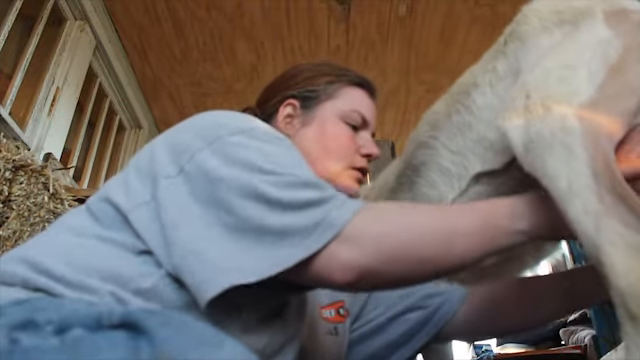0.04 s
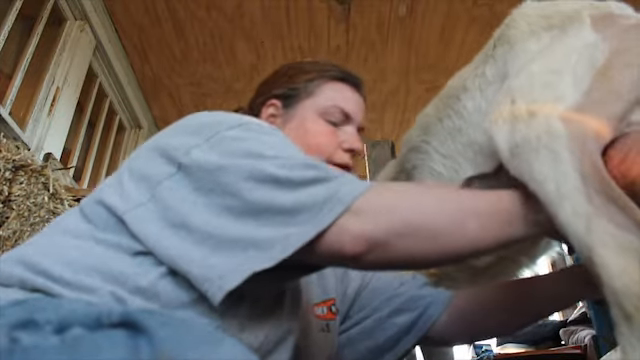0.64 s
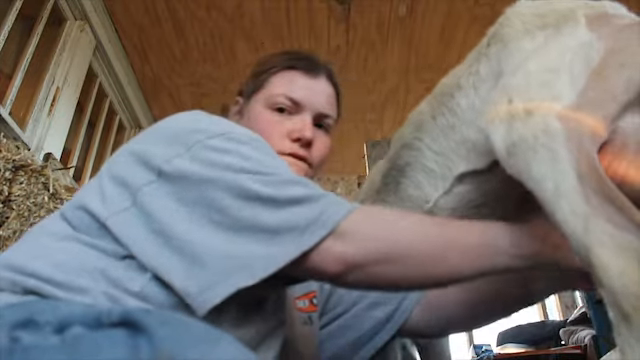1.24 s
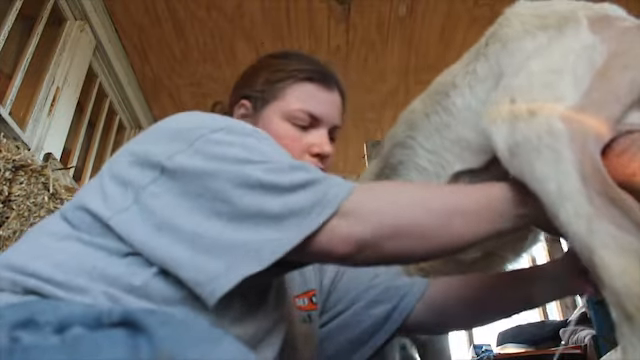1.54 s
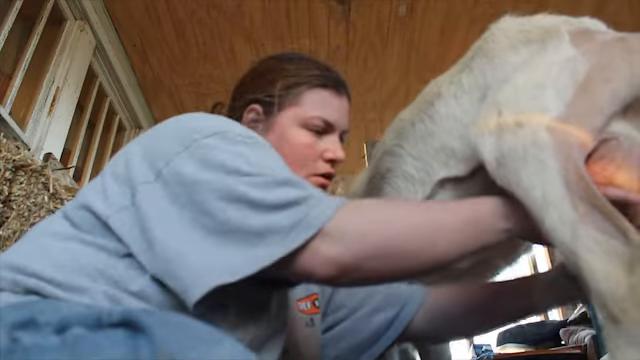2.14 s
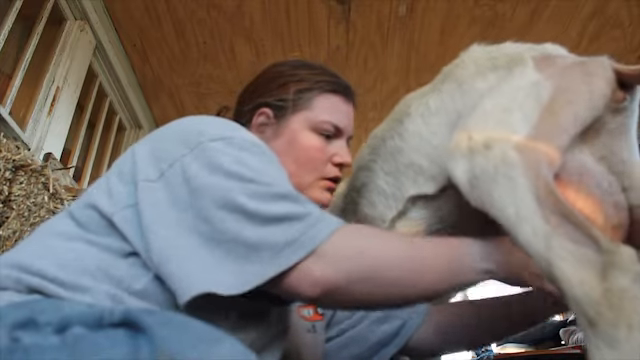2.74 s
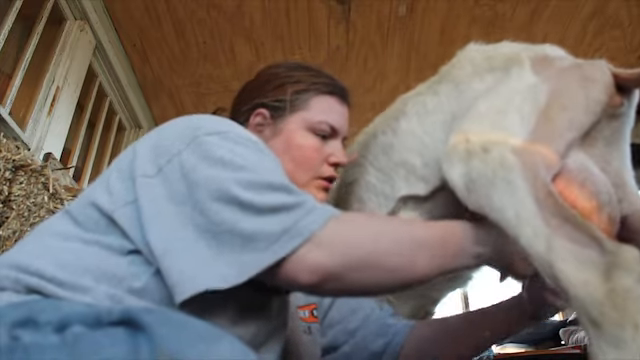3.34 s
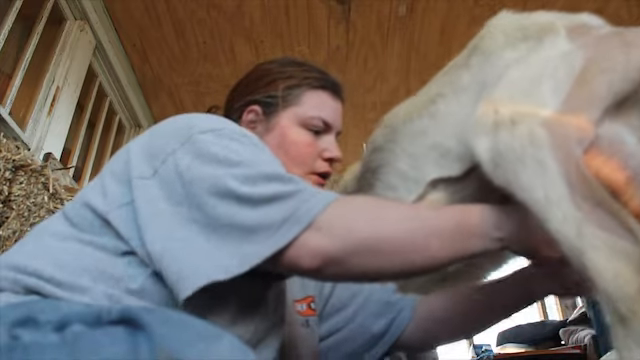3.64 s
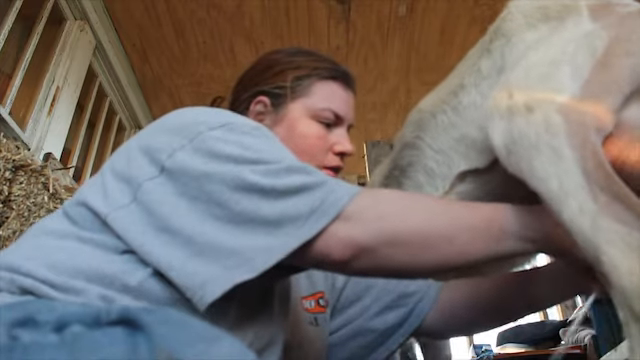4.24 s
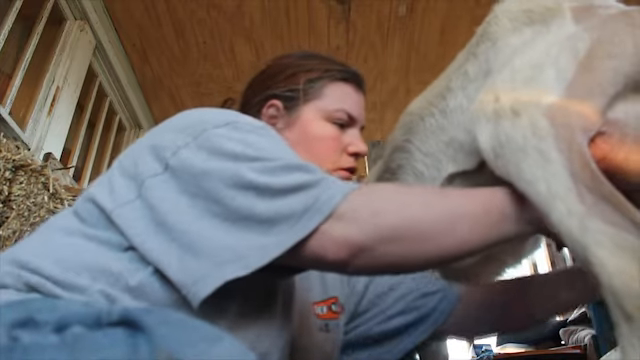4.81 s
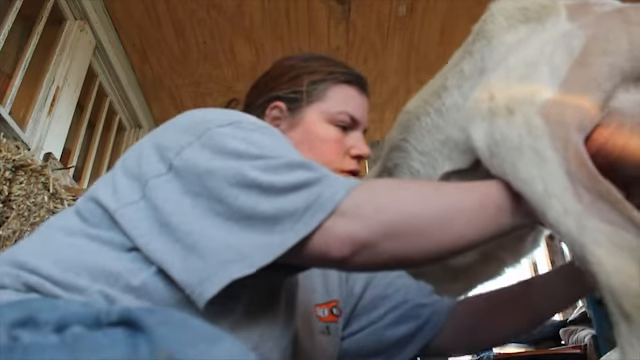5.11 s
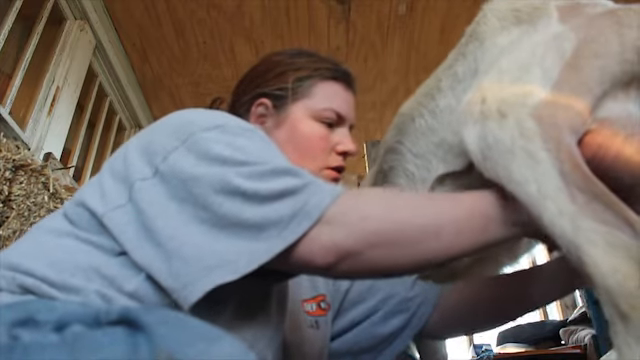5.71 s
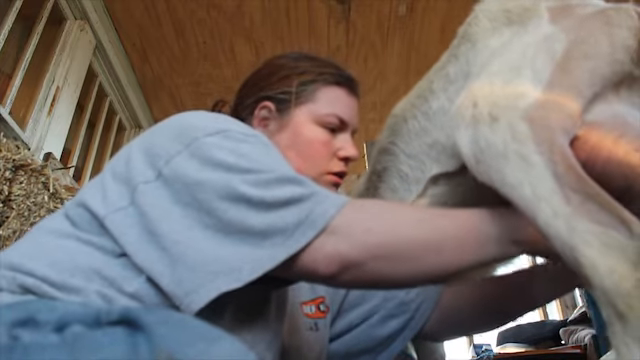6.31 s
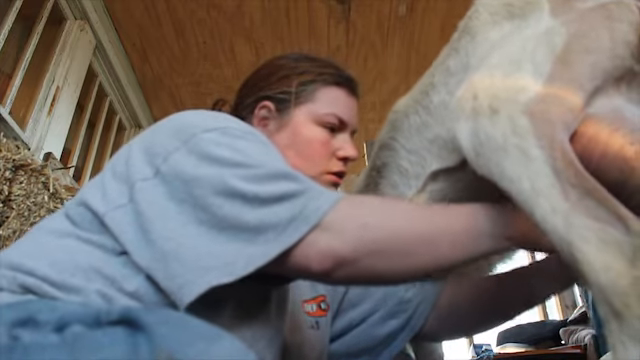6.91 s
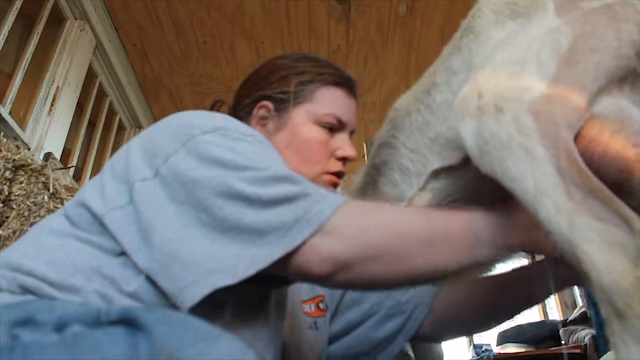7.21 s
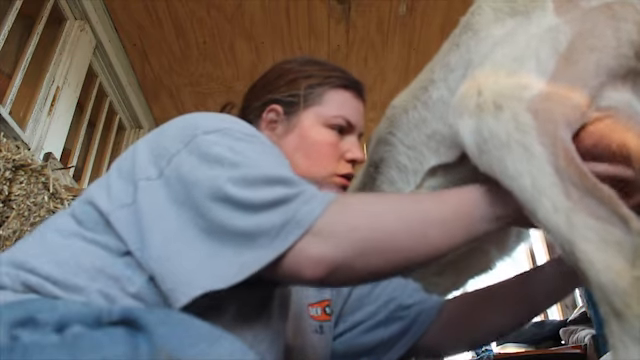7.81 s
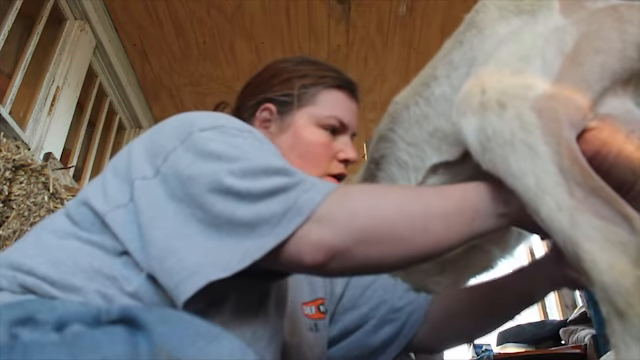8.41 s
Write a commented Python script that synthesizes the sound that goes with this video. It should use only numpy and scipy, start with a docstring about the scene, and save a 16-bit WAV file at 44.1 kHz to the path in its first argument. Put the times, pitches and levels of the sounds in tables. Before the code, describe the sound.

A goat is hand-milked in a small barn, heard up close over a soft rumble and hiss, with faint birds outside. From about 1 to 2.8 seconds, five or six short jets of milk hiss and bubble into a pail, with sharp drops, fizzing foam and a hollow note. A hoof starts dragging near 3 seconds, scrapes harder, and stamps at 3.5 seconds, the loudest sound. The wooden stand groans in low, sliding creaks until about 4.3 seconds, overlapping a longer squirt at 4 seconds. Straw rustles and snaps around 4.5 seconds with a weaker squirt, then the milking pauses and small birds chirp softly. A long squirt arrives at 5.9 seconds with a wooden knock, a strong one at 6.6, and shorter ones until 7.4. Only light knocks and faint straw rustling remain until the end, near 8.7 seconds.

```python
"""Hand-milking a goat

In a small barn, each jet of milk breaks into drops that strike the pail, trap ringing bubbles,
burst the foam and excite the pail's hollow note. The goat drags a hoof and stamps once; its wooden
stand knocks by free vibration and groans by stick-slip friction. Straw rustles, small birds sing
outside, and the walls add a short reverberation over a soft rumble, hiss and hum."""
import sys
import numpy as np
from scipy import signal
from scipy.fft import rfft, irfft
from scipy.io import wavfile
from scipy.ndimage import uniform_filter1d

SR = 44100
rng = np.random.default_rng(int(sys.argv[2]) if len(sys.argv) > 2 else 0)


def store_pcm(level_fs):
    """Save levels as 16-bit WAV."""
    pcm = np.round(np.clip(level_fs, -1, 1) * 32767).astype(np.int16)
    wavfile.write(sys.argv[1], SR, np.atleast_2d(pcm).T)


N = 377055
TIME = np.arange(N) / SR

# Levels in the tables are relative: each source may apply a further gain.
# Spectra of the background, rustling straw and a snapping stalk: (frequency [Hz], level [dB])
AIR_SPECTRUM = [(20, -26), (42, -10.5), (70, -3.5), (120, -11.5), (165, -10.5), (310, -10), (450, -12.5),
                (620, -17), (1500, -19), (2900, -19.5), (4200, -23), (7000, -26.5), (10300, -29.5),
                (12000, -37.5)]
STRAW_SPECTRUM = [(400, 1), (1500, -8), (3000, 8), (6000, 0.5), (12000, -9.5)]
SNAP_SPECTRUM = [(500, -17), (3000, -4), (6000, -2.5), (10500, 0), (12000, -6.5)]
# Tones of the hum: (frequency [Hz], level [dB])
HUM_TONES = [(59.5, -67.5), (103, -63), (119.5, -64)]
# Stirs of the straw: (centre time [s], half length [s], lift [dB])
STRAW_STIRS = [(0.61, 0.048, 13), (3.965, 0.32, 17.5), (4.95, 0.14, 11.5), (5.26, .04, 10),
               (5.4, 0.033, 13.5), (6.487, .11, 10), (7.843, .025, 11.5), (7.95, 0.015, 13),
               (8.24, 0.08, 13)]
# Snapping stalks, and a sharp tick as the squirt at 4.48 s bursts into fizz: (time [s], level [dB])
STALK_SNAPS = [(4.488, -33), (4.513, -32), (4.545, -30), (4.942, -44), (4.972, -44), (5.135, -47),
               (5.39, -49), (5.422, -46), (5.715, -48), (6.478, -54), (7.078, -31), (7.159, -44),
               (7.933, -40), (8.455, -51)]

# Near bird: (time [s], length [s], first pitch [Hz], last pitch [Hz], level [dB], warble depth [ratio])
CHIRPS = [(0.252, 0.051, 3100, 2880, -54, 0.027), (0.545, 0.066, 2990, 3110, -57, .02),
          (0.716, 0.037, 3230, 3410, -50, .02), (0.852, 0.047, 3450, 3210, -52, 0.065),
          (0.892, 0.043, 3750, 3380, -49, 0.075), (1.718, 0.036, 2910, 3420, -49, .02),
          (1.751, .018, 3150, 3080, -50, .02), (4.703, 0.048, 3590, 3520, -40.5, 0.011),
          (4.819, 0.025, 3950, 3450, -45, .07), (4.873, 0.036, 2620, 3030, -49, 0.085),
          (5.002, 0.028, 3900, 3290, -44, .04), (5.037, 0.054, 3700, 3900, -53, 0.07),
          (5.11, 0.054, 4094, 4290, -50.5, 0.024), (5.225, 0.028, 3710, 3250, -54, 0.076),
          (5.266, 0.064, 3460, 4050, -45, 0.018), (5.423, 0.047, 4690, 4950, -55, .03),
          (5.57, 0.048, 4410, 3800, -50, 0.071), (5.702, 0.032, 3610, 2750, -43.5, .04),
          (5.731, 0.05, 2940, 2760, -48.5, 0.023), (5.812, 0.029, 3600, 2740, -53, .1)]
# Second bird: (time [s], length [s], first pitch [Hz], last pitch [Hz], level [dB])
WHISTLES = [(1.945, 0.18, 3253, 3205, -54), (2.35, 0.17, 3160, 3240, -64), (2.78, .07, 3150, 3160, -67),
            (2.89, 0.057, 3170, 3200, -59)]
# Far birds: (centre time [s], half length [s], pitch [Hz], level [dB])
TWITTER_BOUTS = [(0.215, .25, 2984, -61), (0.601, 0.094, 3050, -68), (0.9, 0.052, 3240, -59),
                 (3.303, 0.084, 4180, -58.5), (5.148, .3, 3740, -64.5), (5.836, 0.026, 3160, -58),
                 (6.943, .09, 3000, -54), (7.881, 0.069, 3200, -71), (8.249, 0.28, 2620, -64)]

# Blows of hooves and pail on the stand: (time [s], ring level [dB], crack level [dB])
BLOWS = [(.005, -44, -38.5), (0.322, -48, -48), (.51, -50, -60), (.687, -45, -62), (1.289, -37.5, -41),
         (1.478, -38, -45), (1.541, -31, -46), (1.64, -29.5, -42), (1.838, -22, -25), (2.088, -45, -46),
         (2.456, -45, -52), (2.678, -30.5, -47), (2.753, -34.5, -49), (3.209, -40, -36.5),
         (3.302, -55, -59), (3.541, -4.5, -11), (3.56, -20, -26), (3.571, -14, -42), (3.799, -26, -38),
         (4.697, -36, -54), (4.874, -34.5, -34), (5.179, -46, -47), (5.25, -41, -48), (5.657, -43.5, -52),
         (5.956, -25.5, -44), (6.123, -15.5, -36), (6.398, -40.5, -62), (6.828, -35, -45),
         (7.036, -34, -35), (7.337, -32.5, -48), (7.58, -49, -60), (7.801, -46.5, -63), (7.989, -47.5, -60),
         (8.221, -43.5, -62)]
# Normal modes of the stand: (frequency [Hz], level [dB], 60 dB decay time [s])
STAND_MODES = [(40.2, -33, 1), (87.2, -26, 0.53), (141.4, -23.5, 0.24), (162.2, -30.5, 0.23),
               (268.4, -11, 0.17), (335.8, 7.5, 0.044), (325.6, -23, 0.34), (398.8, -9, 0.14),
               (461, -15, 0.13), (661, -17.5, 0.092), (837, -24, 0.048)]
# Contact spectra of a hoof and of a large drop: (frequency [Hz], level [dB])
HOOF_SPECTRUM = [(30, -62), (150, 11), (400, -5), (560, 3.5), (800, -2.5), (1400, 0), (2500, -5.5),
                 (4000, -11), (7000, -24.5), (12000, -44)]
SPATTER_SPECTRUM = [(200, -5), (800, -0.5), (1600, -0.5), (2600, 1), (3600, -2.5), (4600, -14), (7000, -11),
                    (12000, -37)]

# Large drops on the pail: (time [s], level [dB], resonance of the struck spot [Hz])
SPATTERS = [(1.08, -19.5, 1740), (1.302, -17.5, 3300), (1.316, -20.5, 3100), (1.358, -29.5, 1090),
            (1.472, -33, 900), (1.507, -16, 1150), (1.521, -19, 1150), (1.606, -20, 5200),
            (1.798, -28, 2780), (1.823, -10, 2580), (2.567, -24, 2510), (2.657, -9.5, 3520),
            (2.74, -26, 2980), (4.083, -12, 3350), (4.146, -14, 1500), (4.162, -15, 2650),
            (5.952, -20, 2900), (5.999, -30, 2600), (6.065, -15.5, 3080), (6.071, -15, 3020),
            (6.199, -23, 2300), (6.25, -16, 2180), (6.651, -10.5, 3040), (6.673, -11, 3400),
            (6.691, -13, 3240), (6.810, -34, 3300), (6.826, -32, 3320), (6.865, -32, 2880),
            (7.038, -34, 2070), (7.064, -27, 3400), (7.099, -18, 2600), (7.11, -25, 2400),
            (7.123, -31, 2700), (7.162, -31, 895), (7.327, -33, 3000), (7.370, -11, 3300),
            (7.380, -15, 2550), (7.389, -26, 2600)]
# Resonances of the pail: (frequency [Hz], width [Hz], lift [dB])
PAIL_MODES = [(784, 210, 3), (981, 37, 5), (1130, 68, 4), (1270, 56, 3.5), (1425, 29, 6.5), (1490, 60, 3.5),
              (1550, 26, 2), (1606, 70, 4.5), (1730, 47, 3), (1930, 60, 1.5), (2260, 45, -0.5),
              (2314, 50, 2), (2490, 76, 2.5), (2930, 71, -4), (3170, 77, 2.5), (3445, 110, 3.5),
              (4190, 190, 3)]
# Squeezes of a teat: (time [s], attack [s], hold [s], release [s], swell over the hold [dB],
# patter level [dB], fizz level [dB], hollow note level [dB])
SQUIRTS = [ (1.082, 0.069, 0.099, 0.23, -4, -36, -43.5, -43.5),
           (1.385, 0.04, 0.035, 0.088, 2.5, -42.5, -55, -48),
           (1.469, 0.0089, 0.13, 0.14, 8, -37, -45, -38.5),
           (1.797, 0.044, 0.079, 0.13, -2.5, -37.5, -45.5, -34),
           (2.161, 0.044, 0.11, 0.15, -1, -47, -53, -49),
           (2.568, 0.0088, 0.097, 0.067, 1, -36.5, -42.5, -40),
           (3.656, 0.0067, 0.092, 0.17, 4.5, -44.5, -50, -54),
           (4.025, 0.058, 0.28, 0.13, 2, -37.5, -47, -33.5), (4.479, 0.0052, 0.2, 0.2, 12.5, -53, -49, -73),
           (5.901, 0.11, 0.22, 0.18, 0.5, -36, -45.5, -34),
           (6.602, 0.02, 0.021, 0.056, 3.5, -42.5, -54, -33),
           (6.652, 0.0046, 0.048, 0.17, 4, -34, -42.5, -29.5),
           (6.792, 0.01, 0.032, 0.15, -0.5, -49.5, -56, -38.5),
           (7.03, 0.017, 0.068, 0.12, 0.5, -48, -52.5, -49),
           (7.313, 0.056, 0.0088, 0.05, 10.5, -43, -47, -39), ]
# The jet digging deep: (centre time [s], half length [s], churning lift [dB], bubble pitch [Hz])
PLUNGES = [(1.116, 0.019, 10, 1420), (1.153, 0.012, 3.5, 1650), (1.177, 0.08, 8.5, 1820),
           (1.258, 0.04, 5.5, 1280), (1.472, 0.069, 5, 1140), (1.646, 0.09, 5.5, 1200),
           (1.851, 0.025, 20.5, 1500), (2.277, 0.03, 7, 1910), (2.597, 0.012, 3.5, 2170),
           (4.118, 0.059, 6.5, 1130), (2.687, 0.027, 9, 2070), (4.361, 0.075, 13.5, 1530),
           (6.059, 0.06, 5.5, 1090), (6.273, 0.073, 15.5, 1580), (6.679, 0.033, 17, 1640),
           (6.769, 0.043, 9, 920)]
# Spectra of the four parts of a squirt: (frequency [Hz], level [dB])
CHURN_SPECTRUM = [(200, -41), (500, 0), (750, 4), (1100, 1.5), (1500, -2), (2100, 3), (2700, -1.5),
                  (3600, -46), (8000, -42)]
PATTER_SPECTRUM = [(300, -17), (1200, -21.5), (2200, -5.5), (2800, -0.5), (3500, -5), (4400, -6.5),
                   (5500, -10), (8000, -19), (12000, -47)]
FIZZ_SPECTRUM = [(1500, -19), (4000, -0.5), (5800, 0), (8000, -0.5), (10000, -2.5), (11200, -4.5),
                 (12000, -13)]
HOLLOW_SPECTRUM = [(30, -29), (85, -9.5), (150, -13.5), (250, -9), (330, -3.5), (420, 5.5), (500, -5),
                   (620, -6.5), (1200, -43.5)]

# Drags of the hoof: (time [s], attack [s], hold [s], release [s], swell over the hold [dB],
# scrape level [dB], rumble level [dB])
HOOF_DRAGS = [(2.752, 0.009, 0.036, 0.41, -12, -53, -49), (3.103, 0.099, 0.25, 0.85, -6, -58.5, -49),
              (3.39, 0.021, 0.13, 0.22, 6.5, -36, -31), (3.792, 0.0082, 0.11, 0.06, 0.5, -40, -45),
              (3.935, 0.021, 0.08, 0.047, 4, -48.5, -46), (4.407, 0.016, 0.43, 0.83, 0, -62.5, -55),
              (6.39, 0.062, 0.33, .1, 9, -57.5, -58.5)]
# Spectra of the scrape and of the boards under it: (frequency [Hz], level [dB])
SCRAPE_SPECTRUM = [(200, -10), (560, 0), (800, 4.5), (1000, -0.5), (1400, 4), (2200, -6), (4000, -15.5),
                   (8000, -25.5), (12000, -40)]
BOARD_SPECTRUM = [(30, -4), (80, -2.5), (160, 4), (320, 17), (430, 9), (560, -4.5), (1200, -44.5)]
# One squeak and the groans of the stand: (time [s], length [s], loudest point [share of length],
# first pitch [Hz], pitch at the loudest [Hz], last pitch [Hz], level [dB])
GROANS = [(3.036, 0.26, .6, 1630, 1583, 1560, -58.5), (3.426, 0.053, 0.26, 350, 313, 205, -30),
          (3.475, 0.036, .45, 270, 297, 290, -28), (3.496, 0.13, 0.45, 230, 165.3, 125, -22.5),
          (3.634, 0.136, 0.396, 120, 80, 40, -37), (3.796, 0.065, 0.22, 257.4, 328.5, 337, -23.5),
          (3.852, 0.043, 0.47, 329.3, 292, 256, -24), (3.921, 0.114, 0.36, 291, 311.5, 357, -29.5),
          (4.271, 0.048, 0.44, 215, 159, 103, -27)]

# Reverberation outside and inside: (frequency [Hz], 60 dB decay time [s])
YARD_DECAY = [(1000, 0.24), (3500, 0.13), (8000, .2)]
BARN_DECAY = [(150, 0.45), (500, 0.29), (1400, 0.17), (4000, 0.1), (10000, 0.054)]
# Left-right difference of the background and of the other sounds: (frequency [Hz], gain [dB])
AIR_SIDE = [(60, -13), (170, -8.5), (500, -4), (1440, -4), (4160, -5.5), (12000, -4)]
NEAR_SIDE = [(100, -53), (250, -41), (500, -27.5), (1000, -29), (2000, -27.5), (4000, -29), (8000, -22),
             (12000, -14)]


def amp(db):
    """Amplitude ratio of a level in decibels."""
    return 10 ** (np.asarray(db) / 20)


def unit_rms(x):
    """Normalisation to an rms of one."""
    return x / np.sqrt(np.mean(x ** 2) + 1e-20)


def value_at(points, hz):
    """Interpolation on a logarithmic frequency axis."""
    f, value = np.transpose(points)
    return np.interp(np.log(hz + 1), np.log(f + 1), value)


def add(mix, start, sound):
    """Superposition of a sound on the mix, from a start in seconds."""
    part = mix[max(round(start * SR), 0):][:len(sound)]
    part += sound[:len(part)]


def colour(x, spectrum, modes=(), size=4096):
    """Minimum-phase filtering by a broad spectrum with resonance peaks on top."""
    hz = abs(np.fft.fftfreq(size, 1 / SR))
    peaks_db = sum(lift / (1 + (2 * (hz - f) / width) ** 2) for f, width, lift in modes)
    log_gain = np.log(amp(value_at(spectrum, hz) + peaks_db))
    response = np.fft.ifft(np.exp(np.conj(signal.hilbert(log_gain)))).real
    return signal.oaconvolve(x, response[:size // 2])[:len(x)]


def wander(rate_hz):
    """Random modulation: low-passed noise of unit rms."""
    rolloff = 1 + (np.fft.rfftfreq(N, 1 / SR) / rate_hz) ** 4
    return unit_rms(irfft(rfft(rng.standard_normal(N)) / rolloff, N))


def impacts(per_s, spread_db):
    """Shot noise: a Poisson train of tiny blows of unequal size."""
    sizes = amp(spread_db * np.minimum(rng.exponential(1, N), 4))
    return sizes * rng.choice([-1, 1], N) * (rng.random(N) < per_s / SR)


def crack(spectrum, t60, modes=(), size=4000):
    """A contact transient: exponentially decaying noise with a peak of one."""
    decay = amp(-60 * np.arange(size) / SR / t60)
    burst = colour(rng.standard_normal(size) * decay, spectrum, modes)
    return burst / abs(burst).max()


def air():
    """Ambient noise: a restless rumble under a nearly steady hiss."""
    mid, side = (unit_rms(colour(rng.standard_normal(N), AIR_SPECTRUM, size=16384)) for _ in range(2))
    noise = stereo(mid, side, AIR_SIDE)
    rumble = signal.sosfiltfilt(signal.butter(2, 603, fs=SR, output="sos"), noise)
    hiss = noise - rumble
    return amp(-55.5) * (rumble * amp(4 * wander(rate_hz=3.9)) + hiss * amp(0.45 * wander(rate_hz=5.2)))


def hum():
    """Faint low tones waver by slow amplitude modulation."""
    out = np.zeros(N)
    for hz, db in HUM_TONES:
        amplitude = np.sqrt(2) * amp(db + 2 * wander(rate_hz=6.9))
        out += amplitude * np.sin(2 * np.pi * (hz * TIME + rng.random()))
    return out


def straw():
    """Many tiny contacts sum to a rustle that grows when stirred; brittle fracture gives snaps."""
    rustle = unit_rms(colour(impacts(per_s=2000, spread_db=1.0), STRAW_SPECTRUM))
    stir_db = sum(db * np.exp(-((TIME - centre) / half) ** 2) for centre, half, db in STRAW_STIRS)
    out = amp(-69.5 + stir_db) * rustle
    for start, db in STALK_SNAPS:
        add(out, start, amp(db) * crack(SNAP_SPECTRUM, t60=0.025))
    return out


def bird_note(length, first_hz, last_hz, warble=0, trill_hz=96.4):
    """A gliding tone; frequency modulation gives it an optional warble."""
    hz = np.linspace(first_hz, last_hz, max(int(length * SR), 2))
    trill = np.sin(2 * np.pi * (trill_hz * TIME[:len(hz)] + rng.random()))
    jitter = unit_rms(uniform_filter1d(rng.standard_normal(len(hz)), size=100))
    hz = hz * (1 + warble * (trill + 0.64 * jitter))
    return np.sin(2 * np.pi * np.cumsum(hz) / SR) * signal.windows.tukey(len(hz), .6)


def birds(twitter_per_s=45):
    """Chirps and whistles arrive directly and by reflection, far twitter by reflection alone."""
    chirps, whistles, twitter = np.zeros((3, N))
    for start, length, first_hz, last_hz, db, warble in CHIRPS:
        add(chirps, start, amp(db) * bird_note(length, first_hz, last_hz, warble))
    flutter = unit_rms(amp(3 * wander(rate_hz=160)))
    chirps *= amp(-4.5) * flutter
    for start, length, first_hz, last_hz, db in WHISTLES:
        add(whistles, start, amp(db) * bird_note(length, first_hz, last_hz))
    for centre, half, bout_hz, db in TWITTER_BOUTS:
        for start in np.arange(centre - half, centre + half, 1 / twitter_per_s):
            delay, pitch, glide = rng.uniform(-0.92, 1, 3)
            hz = bout_hz * (1 + 0.168 * pitch)
            note = bird_note(0.0333, hz, hz * (1 + 0.132 * glide), warble=0.026)
            add(twitter, start + delay / twitter_per_s, amp(db) * note)
    echoes = reflections(amp(2) * chirps + amp(-6) * whistles + twitter, YARD_DECAY)
    return chirps + whistles + echoes


def knocks(weight_shifts=8, flex_below_hz=200):
    """Each blow gives a dull crack and sets the stand's damped modes in free vibration."""
    t, out = TIME[:SR], np.zeros(N)
    # faint random blows as the goat shifts its weight
    shifts = [(when * N / SR, -56 - 6 * soft, -70) for when, soft in rng.random((weight_shifts, 2))]
    for start, ring_db, crack_db in BLOWS + shifts:
        onset_s = 0.0036 + 0.0033 / (1 + amp(ring_db + 36))  # soft blows press home more slowly
        press = 1 - np.exp(-(t / onset_s) ** 2)
        detunes = 1 + 0.011 * rng.standard_normal(len(STAND_MODES))  # each lands on another spot
        flex_db = 0.15 * max(ring_db + 8, 0)  # a hard blow bends the whole stand: low modes gain
        ring = np.zeros(SR)
        for (hz, mode_db, t60), detune in zip(STAND_MODES, detunes):
            decay = amp(mode_db + flex_db * (hz < flex_below_hz) - 60 * t / t60)
            ring += press * decay * np.sin(2 * np.pi * hz * detune * t)
        contact = press * crack(HOOF_SPECTRUM, t60=0.12, size=SR)
        add(out, start, amp(ring_db) * ring / abs(ring).max() + amp(crack_db) * contact)
    return out


def spatters():
    """Impact excitation: large drops strike the pail, and each spot resonates at its own pitch."""
    out = np.zeros(N)
    for start, db, hz in SPATTERS:
        spot_mode = (hz, 0.52 * hz, 14)
        add(out, start, amp(db - 6) * crack(SPATTER_SPECTRUM, t60=0.04, modes=PAIL_MODES + [spot_mode]))
    return out


def stroke(start, attack, hold, release, swell_db, open_s=0.0026):
    """Envelope of one push: it opens abruptly, builds, swells or sags, then decays exponentially."""
    t = TIME - start
    build = np.clip(t / open_s, 0, 1) * np.interp(t, [0, attack], [0.21, 1])
    held = np.clip((t - attack) / hold, 0, 1) - .5
    released = np.clip((t - attack - hold) / release, 0, 10)
    return build * amp(swell_db * held - 31.5 * released)


def squeezes(foam_linger_s=0.0073):
    """The amplitudes of patter, fizz and hollow note follow the flow; the foam lingers a little."""
    patter, fizz, hollow = np.zeros((3, N))
    for start, attack, hold, release, swell_db, patter_db, fizz_db, hollow_db in SQUIRTS:
        flow = stroke(start, attack, hold, release, swell_db)
        patter += amp(patter_db) * flow
        hollow += amp(hollow_db) * flow
        fizz += amp(fizz_db) * stroke(start, attack, hold + foam_linger_s, release, swell_db)
    return patter, fizz, hollow


def bubbles(per_s, cycles, rise, band_hz, spread_db, sizes):
    """Trapped bubbles ring as damped oscillators of rising pitch, each size at its own frequency."""
    out = np.zeros(N)
    for hz in np.geomspace(*band_hz, sizes):
        age = np.arange(int(SR * cycles / hz)) * hz / (SR * cycles)
        ring = np.sin(2 * np.pi * cycles * age * (1 + rise * age)) * amp(-45 * age)
        out += np.sqrt(hz) * unit_rms(signal.oaconvolve(impacts(per_s / sizes, spread_db), ring)[:N])
    return unit_rms(out)


def resonate(x, hz, width_hz):
    """A resonance of unit gain whose centre follows the curve hz."""
    carrier = np.exp(2j * np.pi * np.cumsum(hz) / SR)
    pole = np.exp(-np.pi * width_hz / SR)
    return 2 * (carrier * signal.lfilter([1 - pole], [1, -pole], x / carrier)).real


def churning(cloud, rest_hz=1420.0):
    """Air entrainment: a deeper jet makes the cloud ring louder, at a pitch of its own that sinks as the jet
    digs in."""
    lift_db, bubble_hz = np.full(N, -1.5), np.full(N, rest_hz)
    for centre, half, db, hz in PLUNGES:
        progress = (TIME - centre) / half
        depth = np.exp(-progress ** 2)
        lift_db += depth * db
        bubble_hz += depth * (hz * (1 - 0.17 * np.tanh(progress)) - rest_hz)
    bubble_hz *= 1 + 0.059 * wander(rate_hz=32)  # the jet digs in unevenly
    gurgles = bubbles(per_s=260, cycles=40, rise=0.05, band_hz=(700, 3400), spread_db=1.5, sizes=28)
    ringing = resonate(cloud + amp(-1) * gurgles, bubble_hz, width_hz=1040)
    return amp(lift_db) * unit_rms(colour(ringing, CHURN_SPECTRUM, PAIL_MODES))


def pattering(trapped_bubbles):
    """Drop impacts click through the pail's resonances, and some trap a tiny bubble."""
    strikes = unit_rms(impacts(per_s=2500, spread_db=-4.0))
    drops = unit_rms(impacts(per_s=160, spread_db=1.5))
    excitation = strikes + amp(-20) * drops + 0.34 * trapped_bubbles
    return unit_rms(colour(excitation, PATTER_SPECTRUM, PAIL_MODES))


def foam():
    """Film rupture: the foam bursts in clumps, among tiny ringing bubbles."""
    beads = bubbles(per_s=520, cycles=120, rise=0.03, band_hz=(3200, 10000), spread_db=1.2, sizes=26)
    bursts = unit_rms(impacts(per_s=4500, spread_db=-0.8))
    clumps = amp(2.2 * wander(rate_hz=16))
    return unit_rms(colour(bursts + amp(-7.5) * beads, FIZZ_SPECTRUM) * clumps)


def hollow_note():
    """Cavity resonance: drops excite the pail's low note, and big pockets of air gulp."""
    gulps = bubbles(per_s=110, cycles=12.7, rise=0.014, band_hz=(293.4, 443), spread_db=1.0, sizes=8)
    cavity = unit_rms(colour(impacts(per_s=2500, spread_db=4.0), HOLLOW_SPECTRUM))
    return unit_rms(cavity + amp(-3) * gulps)


def milk():
    """One uneven jet drives churning, patter, fizz and hollow note, which add by superposition."""
    flutter = amp(0.63 * wander(rate_hz=130))
    patter_gain, fizz_gain, hollow_gain = squeezes()
    large = bubbles(per_s=4500, cycles=18, rise=0.12, band_hz=(538, 3250), spread_db=2.0, sizes=20)
    small = bubbles(per_s=1400, cycles=127, rise=0.074, band_hz=(2024, 6760), spread_db=3.5, sizes=20)
    splash = patter_gain * (churning(large) + pattering(small))
    fizz = amp(2) * fizz_gain * foam()
    hollow = amp(-1) * hollow_gain * hollow_note()
    return flutter * (splash + fizz + hollow)


def hoof_drag():
    """Sliding friction: the hoof catches on the grain, scraping and shaking the boards."""
    catches = impacts(per_s=3000, spread_db=1.0)
    scrape = unit_rms(colour(catches, SCRAPE_SPECTRUM))
    rumble = unit_rms(colour(catches, BOARD_SPECTRUM))
    return sum(stroke(*shape) * (amp(scrape_db) * scrape + amp(rumble_db) * rumble)
               for *shape, scrape_db, rumble_db in HOOF_DRAGS)


def groans():
    """Stick-slip friction in the loaded wood gives gliding tones of uneven pitch and strength."""
    out = np.zeros(N)
    slip = 1 + 0.0297 * wander(rate_hz=78)
    grip = amp(3.5 * wander(rate_hz=173))
    for start, length, loudest, first_hz, loudest_hz, last_hz, db in GROANS:
        age = np.clip((TIME - start) / length, 0, 1)
        hz = np.interp(age, [0, loudest, 1], [first_hz, loudest_hz, last_hz]) * slip
        arch = amp(db + np.interp(age, [0, loudest, 1], [-5.5, 0, -11.5]))
        envelope = uniform_filter1d(arch * (age > 0) * (age < 1), size=200)
        out += envelope * grip * np.sin(2 * np.pi * np.cumsum(hz) / SR)
    return out


def reflections(x, decays, per_s=4000, size=256):
    """Diffuse reverberation: each band decays at its own rate, with the overall spectrum kept flat."""
    taps = rng.standard_normal(SR) * (rng.random(SR) < per_s / SR) * (TIME[:SR] > .004)
    hz, t, bands = signal.stft(taps, SR, nperseg=size)
    bands = bands * amp(-60 * t / value_at(decays, hz)[:, None])
    tail = rfft(signal.istft(bands, SR, nperseg=size)[1][:SR])
    flat = tail / np.sqrt(uniform_filter1d(abs(tail) ** 2, size=40))
    return signal.oaconvolve(x, irfft(flat)[:SR // 2])[:N]


def barn(x, patterns=5, crossfade_s=0.07):
    """Time-varying reflection from plywood walls: the paths change as jet, arms and goat move."""
    out = np.zeros(N)
    for k in range(patterns):
        away = (TIME / crossfade_s - k + 1) % patterns - 1
        out += reflections(x * np.cos(np.pi / 2 * np.minimum(away, 1)), BARN_DECAY)
    return out


def stereo(mid, side, side_gains):
    """Spatial coherence: two close listening points share the bass and differ more in the treble."""
    difference = irfft(rfft(side) * amp(value_at(side_gains, np.fft.rfftfreq(N, 1 / SR))), N)
    return np.array([mid + difference, mid - difference])


def scene():
    """Direct sound, weaker wall reflections and the background superpose in two channels."""
    sounds = milk() + spatters() + knocks() + hoof_drag() + groans() + straw() + birds()
    mid = sounds + amp(-7) * barn(sounds)
    side = reflections(sounds, BARN_DECAY)
    add(side, 0.0053, amp(8) * sounds)  # the floor reflection reaches left and right unequally
    return stereo(mid, side, NEAR_SIDE) + air() + hum()


def record(dry):
    """Band limiting at 12 kHz, with the left channel a little louder."""
    channels = dry * amp([[.2], [-.2]])
    lowpass = signal.firwin(511, 12000, window=("kaiser", 9), fs=SR)
    return signal.oaconvolve(channels, lowpass[None], "same")


dry = scene()
out = record(dry)
store_pcm(out)
```